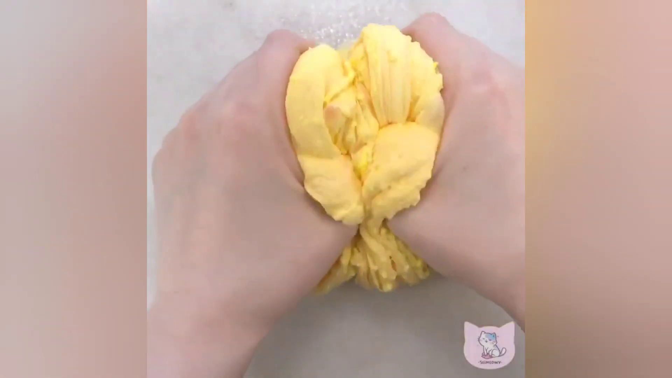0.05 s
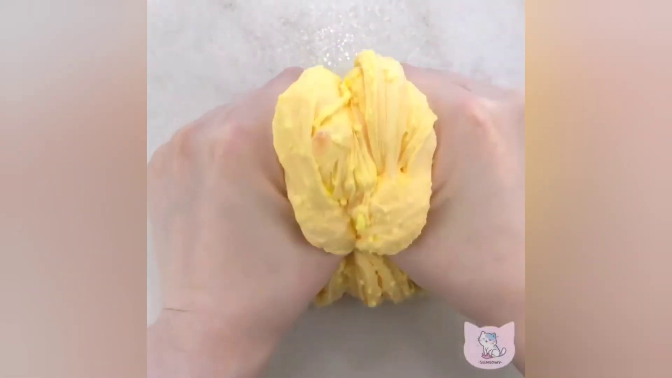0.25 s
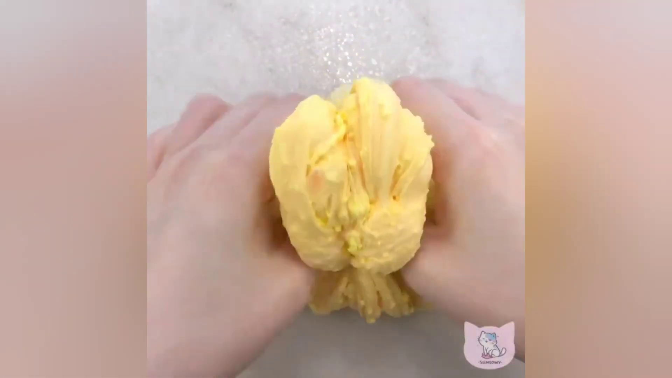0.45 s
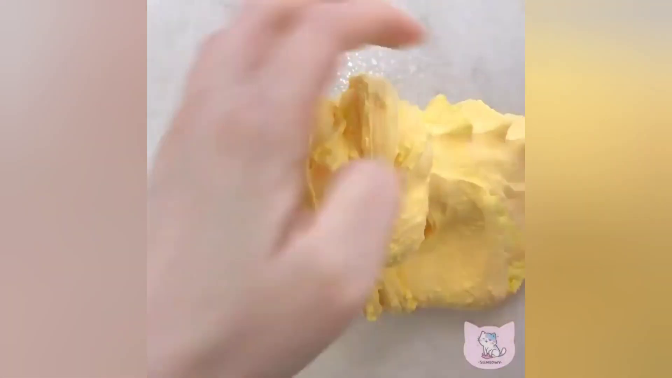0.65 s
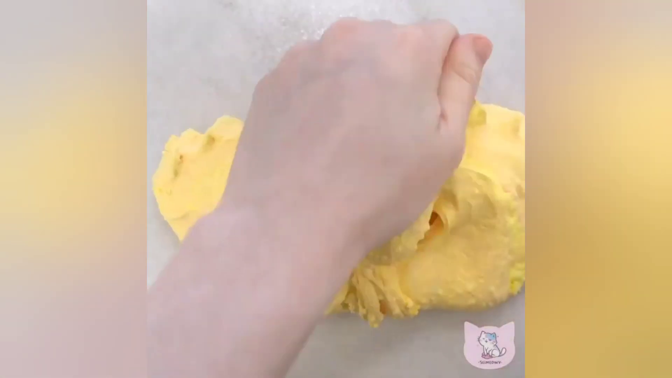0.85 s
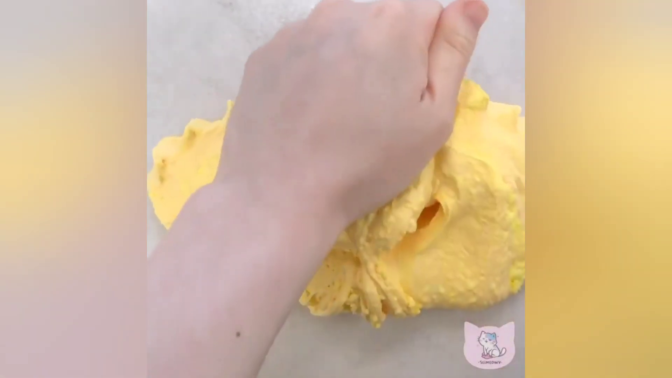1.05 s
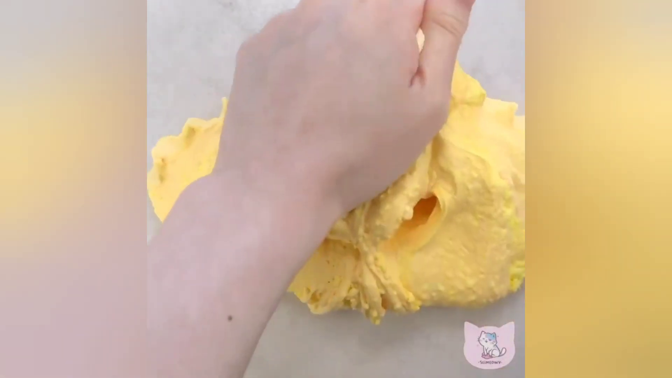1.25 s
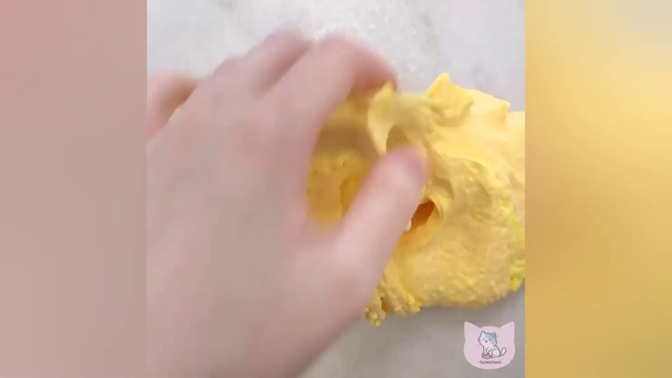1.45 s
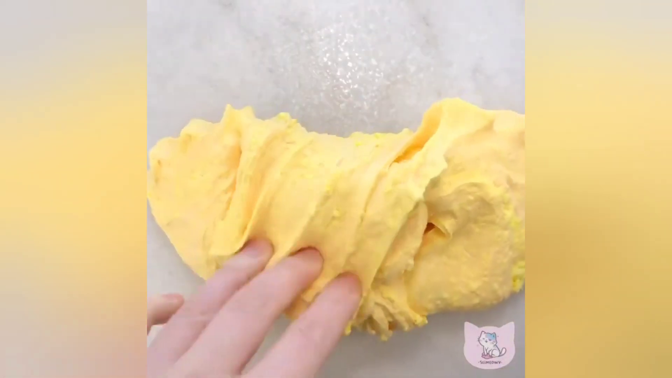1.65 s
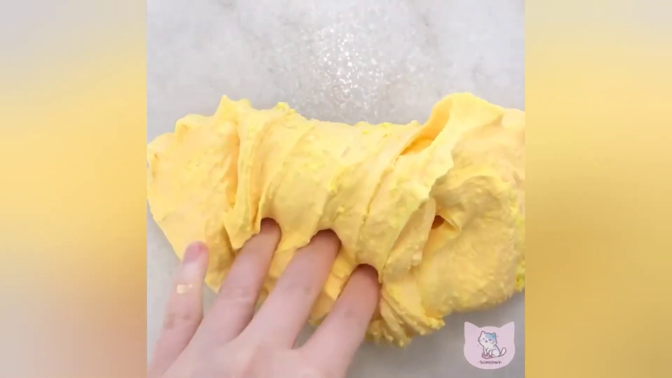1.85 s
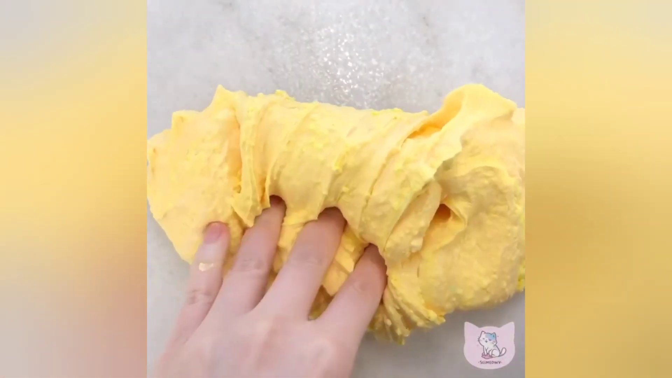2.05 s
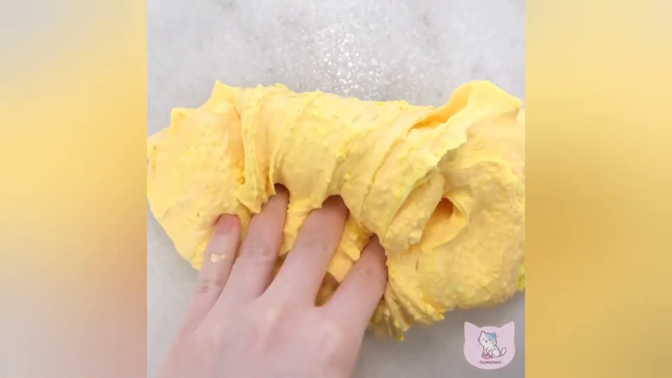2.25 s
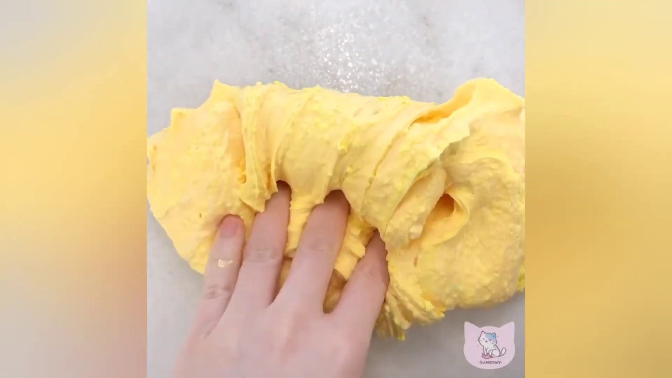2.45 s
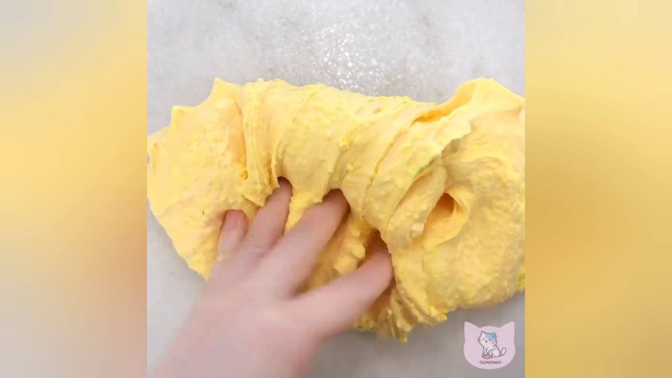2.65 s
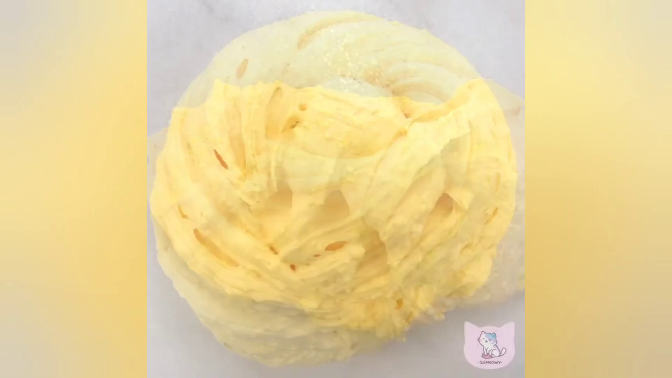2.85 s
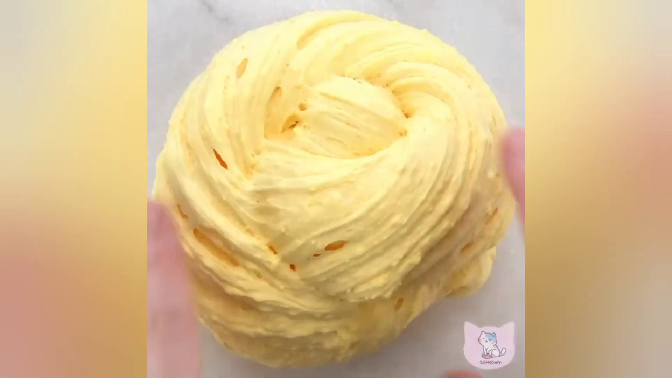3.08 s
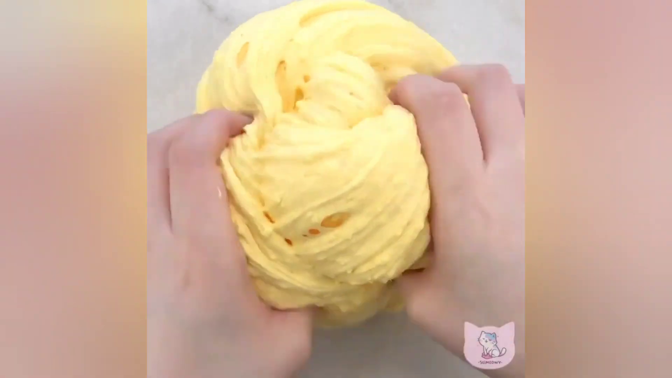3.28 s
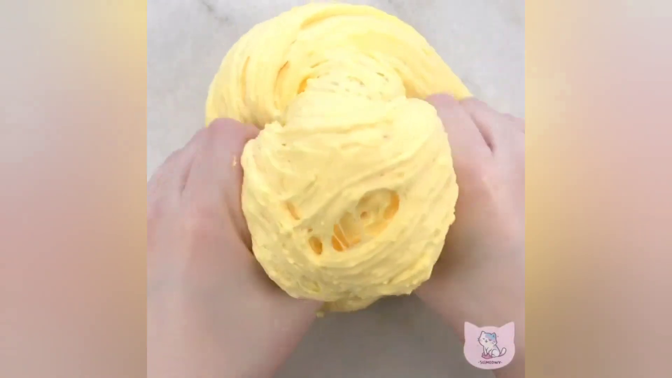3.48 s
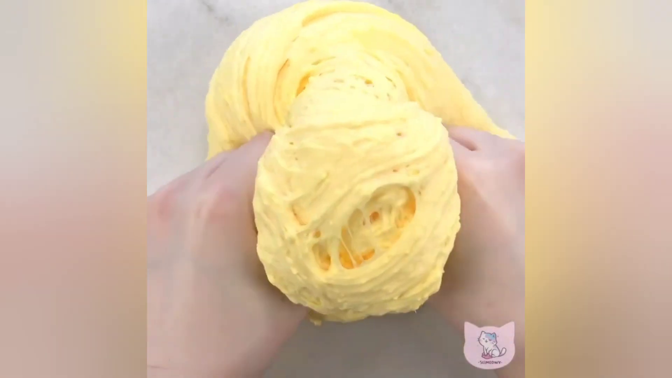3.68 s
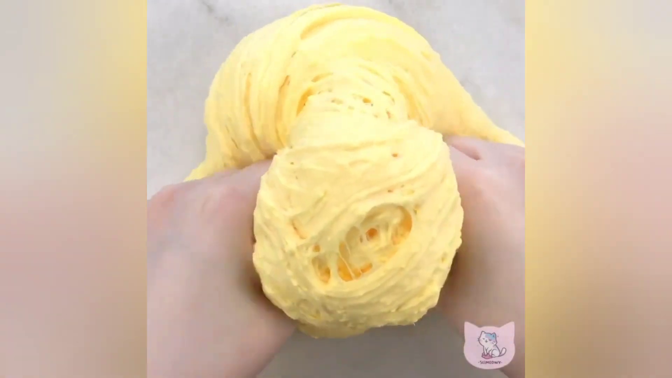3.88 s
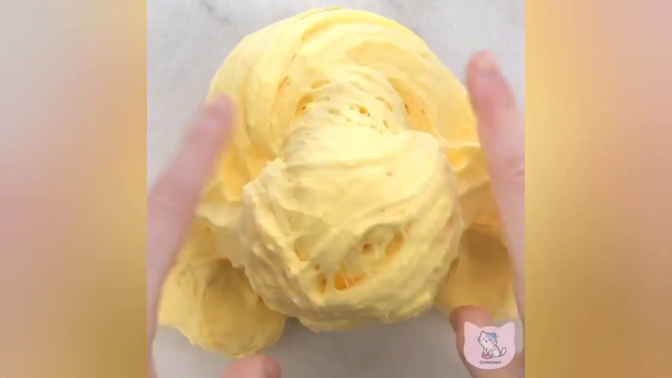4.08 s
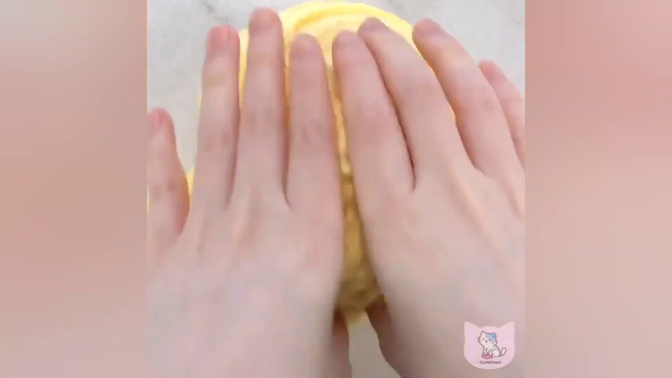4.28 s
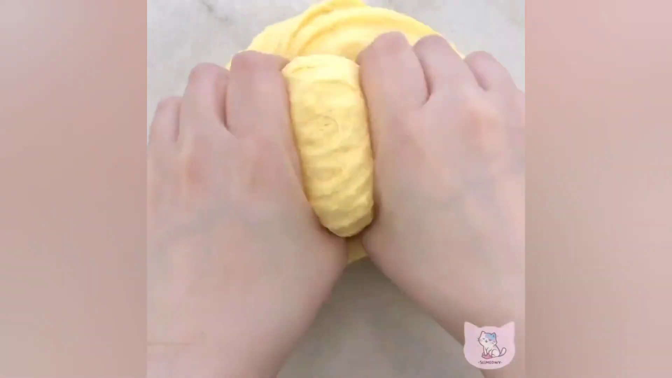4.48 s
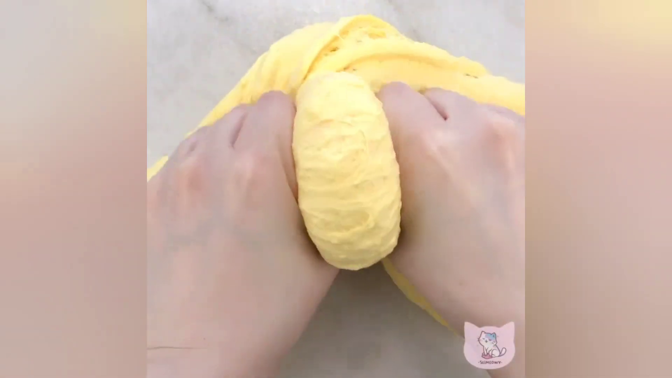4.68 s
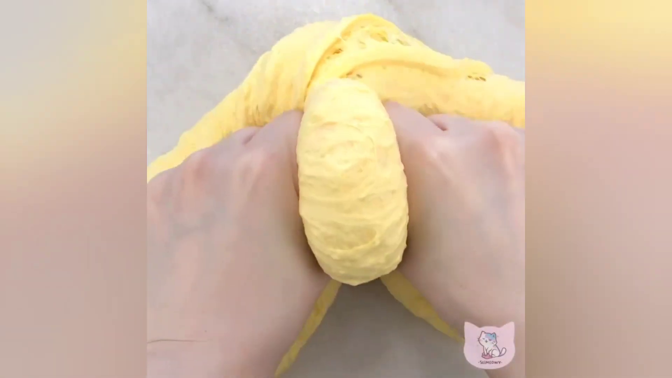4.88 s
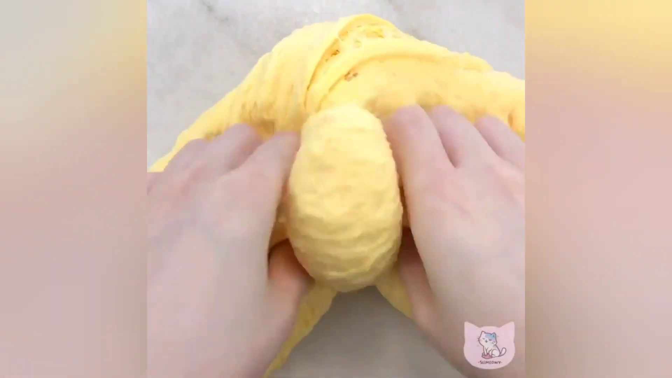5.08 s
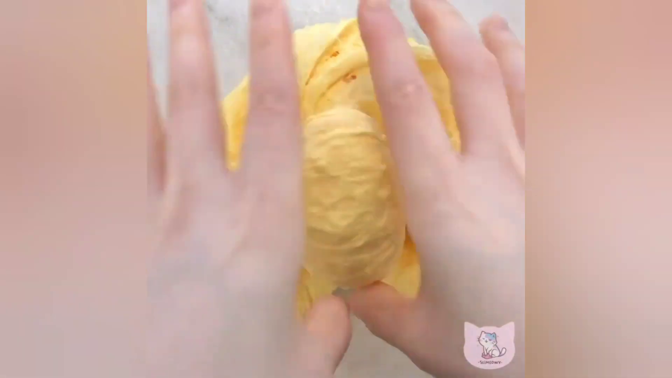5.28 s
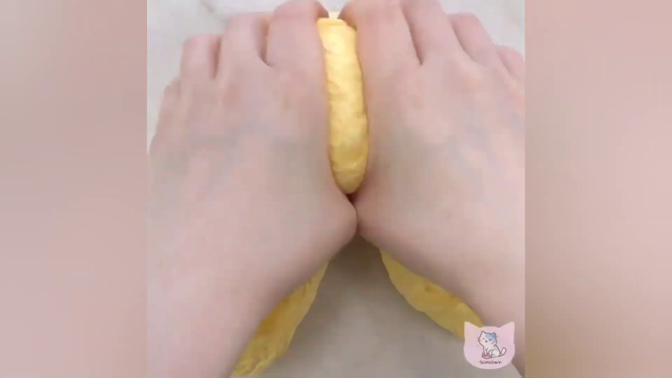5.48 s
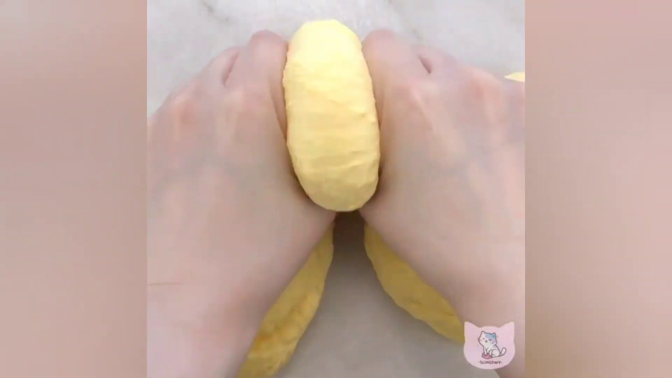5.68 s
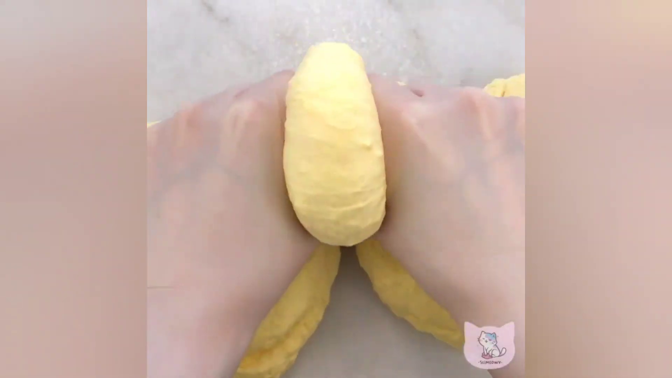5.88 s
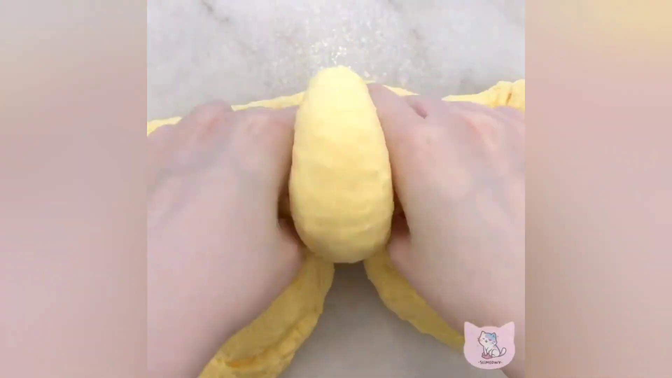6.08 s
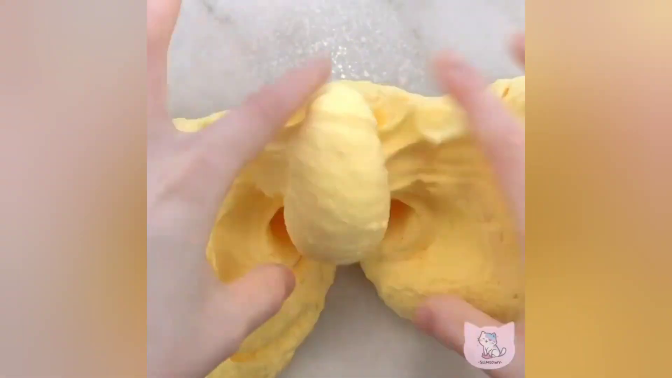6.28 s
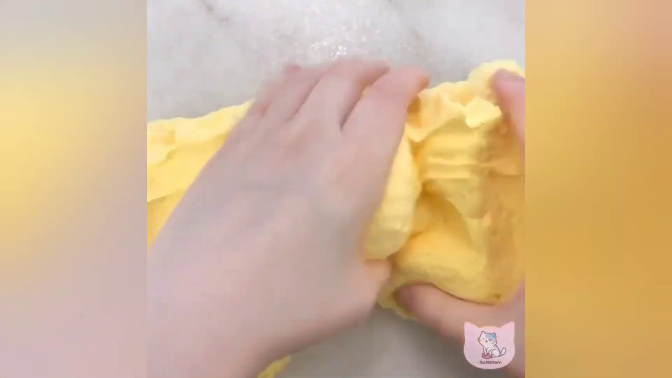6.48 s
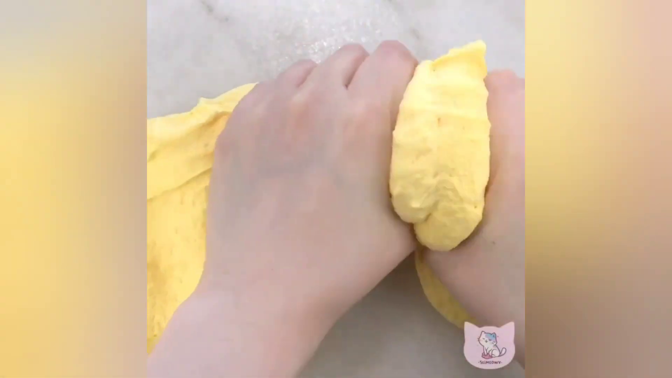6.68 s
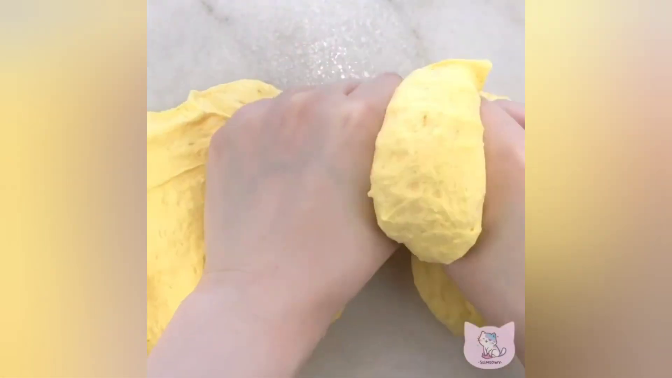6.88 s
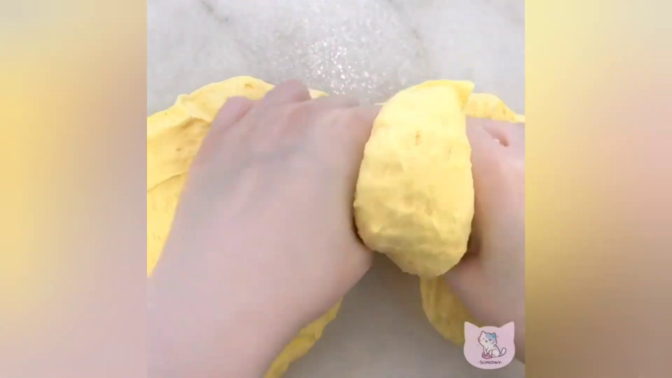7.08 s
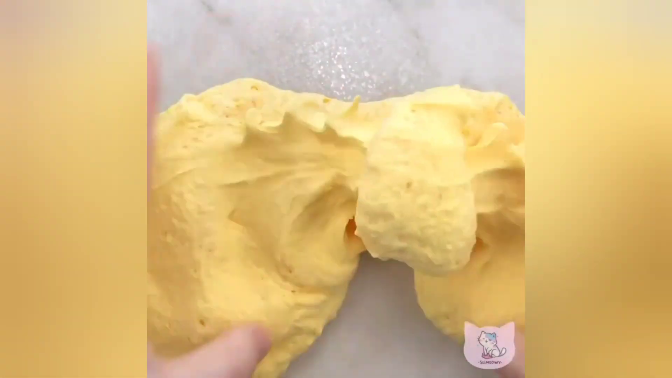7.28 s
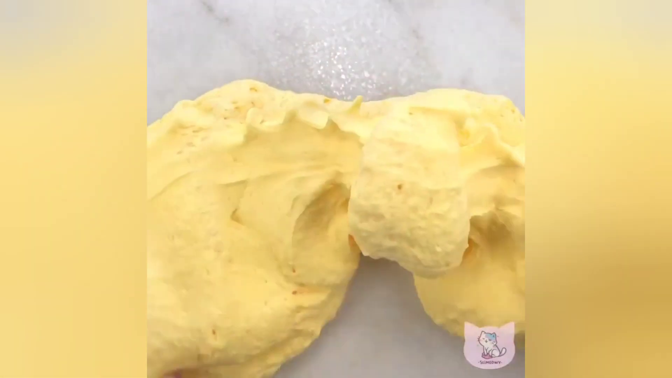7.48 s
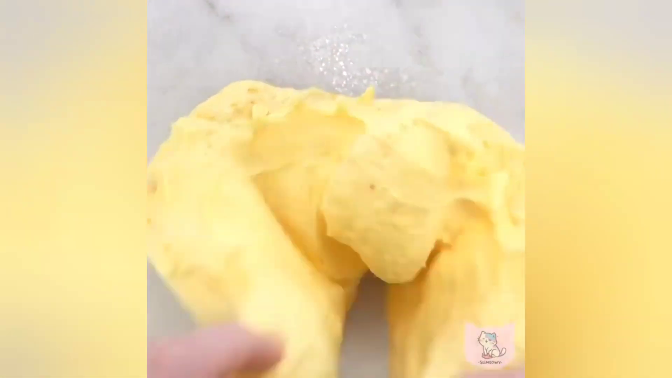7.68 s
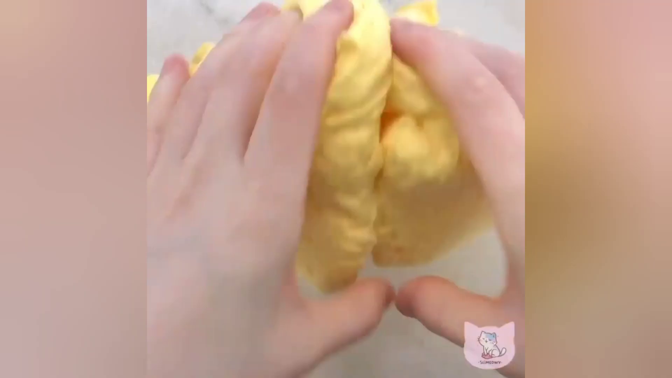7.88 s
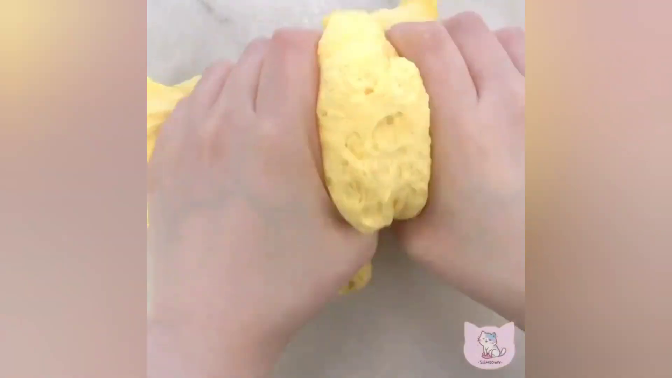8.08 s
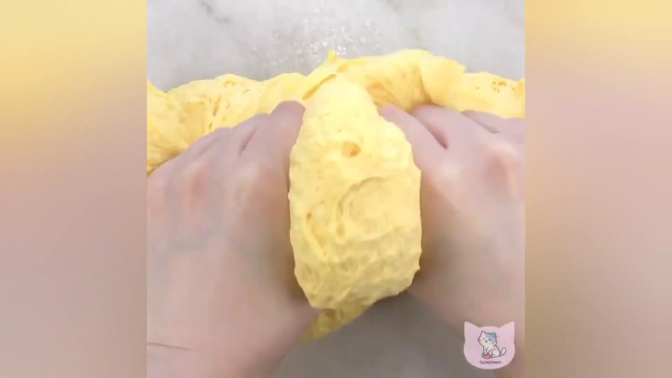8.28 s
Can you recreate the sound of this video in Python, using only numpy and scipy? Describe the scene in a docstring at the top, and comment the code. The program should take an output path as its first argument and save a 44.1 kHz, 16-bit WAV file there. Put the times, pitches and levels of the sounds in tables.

```python
"""Sharp pops and a rush of tearing come first: two hands squeeze, tear and fold a thick airy slime on a
stone worktop, close to one microphone. Bursting air pockets are chirps that fall in pitch, with thuds and
sprays of noise; tearing films are random crackle split into fizz, smack and squelch. Suction and bubbles
ring as hollow tones, slits hiss or squeak, and below lie a quiet room hum and a far engine changing speed."""
import sys
import numpy as np
from scipy import signal
from scipy.io import wavfile

SR = 44100
rng = np.random.default_rng(int(sys.argv[2]) if len(sys.argv) > 2 else 0)


def wrap_up_sound(samples):
    """Save the sound to the file named by the first command line argument, as 16-bit audio."""
    columns = np.atleast_2d(samples).T
    # keep every value between -1 and 1, then stretch to whole-number steps
    tamed = np.clip(columns, -1, 1)
    steps = np.round(tamed * 32767).astype(np.int16)
    wavfile.write(sys.argv[1], SR, steps)


N = 367794  # length in samples

# Bursting air pockets: start_s, chirp_level_db, pitch_hz (the chirp falls from 1.32 to 0.5 times this),
# thud_level_db, snap_level_db, fray_db (under the snap); chirp and snap levels are before trim
POCKETS = [(0.016, 4.5, 3340, -10, -24, -2), (0.047, -10.5, 990, -21, -28, -1),
           (0.069, -25, 5050, -15, -27, -20), (0.108, -9, 8500, -3.5, -18, -6),
           (0.127, 6, 8300, -40, -27.5, -6), (0.174, -22, 8000, -45, -41, -9),
           (0.199, -17, 7300, -13, -20, -8.5), (0.245, -11.5, 1870, -25, -23, -1.5),
           (0.253, -17, 3840, -45, -26.5, -13), (0.384, -12.5, 3670, -36, -53, -12),
           (0.736, -18.5, 2220, -32, -63, -12), (0.748, -26, 1500, -27, -57, -16),
           (0.780, -20, 1300, -40, -55, -14), (0.761, -14.5, 1070, -19.5, -63, -12),
           (0.804, -17.5, 990, -43, -46, -9), (0.815, -8, 5000, -41, -31, -8),
           (0.859, -4.5, 5860, -27, -37, -22), (0.877, -9, 1620, -12.5, -38, 4),
           (0.935, -0.5, 3180, -15, -35, 2), (0.953, -2.5, 1750, -14, -32.5, 3),
           (0.993, -30, 2500, -35, -34, 2), (1.013, -23, 1470, -20, -30, -16),
           (1.03, 5.5, 8700, -27, -22.5, -8), (1.043, -5, 8730, -40, -39, -27),
           (1.063, -5, 7020, -42, -19, -7.5), (1.078, -19, 1450, -18, -35, -19.5),
           (1.099, -1.5, 2540, -5.5, -22.5, -9), (1.156, -0.5, 1380, -6, -14, -4.5),
           (1.164, -14, 1080, -42, -32, -15), (1.244, -16.5, 3250, -45, -42.5, -4),
           (1.39, -22, 3230, -25, -48, 3), (1.614, -9.5, 3600, -28.5, -34, -0.5),
           (1.677, -24, 3380, -54, -48, 0), (1.702, -7, 8000, -53, -28.5, -14),
           (1.736, -13, 2730, -28, -43, -19), (1.805, -33, 5670, -56, -46, -24),
           (1.827, -11.5, 5600, -59, -32.5, -16), (1.973, -31.5, 1090, -38, -42, -13),
           (2.117, -30, 5960, -63, -45.5, -4), (2.158, -19, 9000, -46, -45, -9),
           (2.39, -20.5, 6700, -44, -54, -10), (2.586, -29, 2140, -48, -40, -26),
           (2.605, -19, 1730, -31, -57, -18), (2.65, -24, 1780, -11, -30, -7),
           (2.67, -10, 6500, -20, -31.5, -5), (2.717, -20.5, 2280, -21, -35.5, -16),
           (3.253, -16, 7800, -33, -32.5, -3), (3.406, -13.5, 1610, -54, -37, -12),
           (3.44, -38, 2700, -45, -35, -22), (3.704, -27, 8700, -25, -24.5, -16),
           (3.908, -6, 1710, -13, -37, -22), (3.92, -6.5, 1640, -14, -45, -17),
           (4.416, -18, 5830, -33, -42, -10), (4.548, -26, 8270, -39, -27.5, -13),
           (4.559, -33, 2020, -37, -35.5, -3), (4.593, -12, 6360, -43, -31, -2.5),
           (4.743, -13, 2370, -17.5, -35, -1), (4.806, -23, 3320, -52, -42, -5),
           (5.051, 6, 1830, -2, -26, -7), (5.467, -17, 1600, -42, -37, -14),
           (5.491, -10, 6200, -36, -51, -12), (5.632, -31, 4050, -38, -37, -3),
           (5.703, -32, 1420, -27, -34.5, -12), (5.75, -1.5, 2130, -12, -21.5, -32),
           (5.814, -18.5, 1080, -44, -52, -12), (5.849, -20, 7700, -44, -33.5, -6.5),
           (5.877, -16, 2030, -32, -31, -24), (6.1, 1, 2200, -5, -34, -5),
           (6.106, 2.5, 1104, -1.5, -27, -18), (6.438, -24, 1150, -39, -29.5, -9),
           (6.456, -10.5, 1670, -37, -25.5, -10), (6.502, -2.5, 2700, -17, -21.5, -15),
           (6.517, -9.5, 1390, -40, -35, -5), (6.548, -14, 2500, -31, -42, -14),
           (6.642, -24, 1430, -20.5, -32, -5), (6.714, -21, 8020, -51, -29.5, -12),
           (6.755, -28, 1300, -46, -28, -9), (6.816, -12.5, 3480, -33, -42, -2),
           (6.867, -20.5, 1110, -31, -37, -1), (7.072, -8, 1520, -30, -39, -9),
           (7.096, -0.5, 1880, -5, -38, -16), (7.100, -7, 6500, -40, -31, -5),
           (7.369, -13.5, 4450, -46, -37.5, -9), (7.823, -13, 6800, -39, -35, -9),
           (7.923, -22, 1960, -39, -43, -2), (8.025, -13, 3320, -45, -41, -12),
           (8.18, -27, 5400, -46, -35, -5), (8.217, -13, 5300, -32, -27.5, -12),
           (8.24, -10, 4400, -48, -23, -20), (8.27, -7, 7300, -33, -27.5, -4)]


def from_db(db):
    """Turn a level in dB into a gain."""
    return 10 ** (np.asarray(db) / 20)


def rms_one(x):
    """Scale a signal to an rms level of 1."""
    return x / np.sqrt(np.mean(x ** 2) + 1e-20)


def in_time(rows):
    """Draw straight lines between table rows, giving each column a value at every sample."""
    s, *columns = np.transpose(rows)
    return [np.interp(np.arange(N) / SR, s, column) for column in columns]


def drift(rate_hz):
    """Smooth random wandering of spread about 1: noise through a low-pass set by rate_hz."""
    step = 40  # samples between the slow values
    r = np.exp(-2 * np.pi * rate_hz * step / SR)
    noise = rng.standard_normal(N // step + 2002)
    slow = signal.lfilter([1], [1, -2 * r, r * r], noise)[2000:]  # drop the filter's start-up
    return np.interp(np.arange(N) / step, np.arange(len(slow)), rms_one(slow))


def band(x, low_hz, high_hz):
    """Keep mainly the sound between two frequencies."""
    sos = signal.butter(2, [low_hz, min(high_hz, .45 * SR)], "band", fs=SR, output="sos")
    return signal.sosfilt(sos, x)


def coloured(excite, spectrum, flicker_db, rate_hz):
    """Shape two noises, used in turn, in half-octave bands that each flicker separately; rms 1."""
    hz, db = np.transpose(spectrum)
    band_count = np.ceil(2 * np.log2(hz[-1] / hz[0]))
    edges = hz[0] * np.sqrt(2) ** np.arange(band_count + 1)
    out = 0
    for k, (low, high) in enumerate(zip(edges, edges[1:])):
        level_db = np.interp(np.log(low * high) / 2, np.log(hz), db)
        gain = from_db(level_db + flicker_db * drift(rate_hz))
        out = out + gain * band(excite[k % 2], low, high)
    return rms_one(out)


def crackle(per_s, spread_db, smooth, clump_db):
    """Tiny ruptures of very uneven size arrive in clumps, over a smooth rush of air (smooth: its power share)."""
    born = rng.random(N) < per_s * from_db(clump_db * drift(25)) / SR
    size_db = spread_db * np.minimum(rng.exponential(1, (2, N)), 5)
    ruptures = born * from_db(size_db) * rng.choice([-1, 1], (2, N))
    rush = rng.standard_normal((2, N))
    return np.sqrt(1 - smooth) * rms_one(ruptures) + np.sqrt(smooth) * rush


def kneading():
    """Films fizz on top, wet faces smack apart in the middle, finger hollows squelch below."""
    # Tone of each layer, all three: pitch_hz, relative_level_db (per Hz)
    fizz_tone = [(1470, -26), (2500, -12.5), (5440, -0.5), (8870, -5.5), (14900, -9), (16000, -9)]
    smack_tone = [(400, -32), (600, -1.5), (1000, 1.5), (2000, 2.5), (3500, -0.5), (5500, -15.5)]
    squelch_tone = [(59, -55), (100, -13), (242, 1.5), (393, -2), (473, -16), (900, -7.5), (1170, -16.5),
                    (1980, -120)]
    fizz_gain, smack_gain, squelch_gain = handling()
    throb_db = 1.5 * drift(30)  # tearing goes in jerks, heard in all layers at once
    tearing = crackle(500, 4.7, 0.65, 5.0)  # the same ruptures tick in the treble and the middle
    fizz = coloured(tearing, fizz_tone, 2.5, 20) * fizz_gain * from_db(throb_db)
    wet_faces = 0.84 * coloured(tearing, smack_tone, 2.5, 30) + 0.43 * blips(300, 16)
    smack = wet_faces * smack_gain * from_db(throb_db)
    low_crackle = crackle(200, 3.5, .7, 3.0)
    squelch = coloured(low_crackle, squelch_tone, 2.0, 12) * squelch_gain * from_db(throb_db / 2)
    return fizz + smack + squelch


def handling():
    """Gains of fizz, smack and squelch: each press or peel touches, swells, sags and is let go; bursts fizz on."""
    # Hands press in and the films tear: strongest_s, lead_s (from first touch), length_s,
    # swell_db_per_s, sag_db_per_s, fizz_db, smack_db, squelch_db (levels before mixing)
    presses = [(0.0, .01, 0.37, 94, 88, -27.5, -29, -33), (0.904, 0.15, 0.32, 66, 22, -43, -38.5, -50),
               (1.51, .1, 0.63, 52, 35, -56, -65, -64), (3.256, .12, 0.49, 53.5, 17, -40.5, -45, -51),
               (4.43, 0.17, 0.45, 40, 35.5, -38, -41.5, -49),
               (5.471, 0.091, 0.29, 90, 20.5, -38.5, -41, -45.5),
               (5.85, 0.045, 0.12, 150, 82, -44.5, -49.5, -53.5),
               (6.528, 0.16, 0.42, 104, 26.5, -37, -40, -46),
               (7.424, 0.064, 0.32, 203, 21.5, -41, -39.5, -39), (8.21, 0.42, .2, 21, 19, -39, -40, -49.5)]
    # Sticky hands peel off the slime: strongest_s, length_s, sag_db_per_s,
    # fizz_db, smack_db, squelch_db (levels before mixing)
    peels = [(0.432, 0.09, 21, -33.5, -33.5, -36), (1.311, 0.12, 35, -41, -38, -51),
             (2.674, 0.041, 147, -36.5, -39.5, -40.5), (3.915, 0.15, 63, -27, -25.5, -27),
             (5.063, 0.15, 80, -27, -26, -23), (6.104, .14, 110, -26, -24.5, -24.5),
             (7.1, .1, 87, -26.5, -24.5, -22.5)]
    # The slime creeping when left alone: fizz_db, smack_db, squelch_db, before the changes below
    rest_db = [-64, -64.5, -58.5]
    low_rise_s, low_rise_db = 3.0, 6  # from here on the low squelch layer is louder
    hush_start_s, hush_end_s, hush_db = 2.5, 3.11, -7.5  # no hand on it: creeping fizz and smack sink
    peel_lead_s, peel_swell_db_per_s = .1, 299
    touch_db_per_s, let_go_db_per_s = 498, 448  # how fast contact starts and ends
    after_fizz_db = [-9, -17.5, -15]  # a burst film fizzes on: fizz, smack, squelch, under its fraying
    after_fizz_t60_s, after_fizz_rise_s = 0.085, 0.001

    t = np.arange(N) / SR
    hush = np.outer([hush_db, hush_db, 0], (t > hush_start_s) & (t < hush_end_s))
    low_rise = np.outer([0, 0, low_rise_db], t > low_rise_s)
    gain = from_db(np.c_[rest_db] + hush + low_rise)

    full_peels = [(s, peel_lead_s, length, peel_swell_db_per_s, *rest) for s, length, *rest in peels]
    for s, lead, length, swell, sag, *level_db in presses + full_peels:
        before, after = np.maximum(s - t, 0), np.maximum(t - s, 0)
        rise_db = swell * before + touch_db_per_s * np.maximum(before - lead, 0)
        fall_db = sag * after + let_go_db_per_s * np.maximum(after - length, 0)
        gain += from_db(np.c_[level_db] - (rise_db + fall_db))

    bursts = np.zeros(N)
    for s, *_, snap_db, fray_db in POCKETS:
        bursts[round(s * SR)] += from_db(snap_db + fray_db)
    decay = from_db(-60 / (after_fizz_t60_s * SR))
    dying = signal.lfilter([1], [1, -decay], bursts + 1e-18)
    slow = np.exp(-1 / (after_fizz_rise_s * SR))
    after_fizz = signal.lfilter([1 - slow], [1, -slow], dying)
    return gain + from_db(np.c_[after_fizz_db]) * after_fizz


def blips(per_s, cycles):
    """Small wet bubbles close at random, each ringing a few cycles at one of 16 pitches; rms 1."""
    size_db = 5 * np.minimum(rng.exponential(1, N), 3.5)
    born = (rng.random(N) < per_s / SR) * from_db(size_db)
    pitch_number = rng.integers(0, 16, N)
    out = 0
    for k, hz in enumerate(np.geomspace(600, 3200, 16)):
        r = from_db(-60 * hz / (cycles * SR))  # 60 dB down after this many cycles
        w = 2 * np.pi * hz / SR
        strikes = (-1) ** k * born * (pitch_number == k) + 1e-18
        out = out + signal.lfilter([0, np.sin(w)], [1, -2 * r * np.cos(w), r * r], strikes)
    return rms_one(signal.lfilter([.3], [1, -.7], out))  # soften the treble


def pops():
    """Each burst: a falling chirp as the hole widens, a low thud, a snap, a spray of torn film, a worktop echo."""
    size = 4096  # samples per burst
    t = np.arange(size) / SR
    body, spray, click = np.zeros((3, N + size))
    thud_cycles = 420 * t + 1500 * 0.00163 * (1 - np.exp(-t / 0.0013))  # falls towards 420 Hz
    thud = np.sin(2 * np.pi * thud_cycles) * from_db(-60 * t / 0.016) * (1 - np.exp(-t / 0.0024))
    snap = (t / .0005) ** 2 * np.exp(2 - 2 * t / .0005)  # the film gives way within a millisecond
    fray = from_db(-60 * t / 0.049) * (1 - np.exp(-t / 0.0011))  # then its edges fray
    for s, chirp_db, hz, thud_db, snap_db, fray_db in POCKETS:
        at = round(s * SR)
        # pitch drops as the cavity opens
        cycles = hz * (.5 * t + 1.008 * 0.0013 * (1 - np.exp(-t / 0.0016)))
        chirp_fade = from_db(-60 * t * hz / 14.0)  # higher pitches die sooner
        chirp = np.sin(2 * np.pi * cycles) * chirp_fade * (1 - np.exp(-t / 0.000062))
        body[at:at + size] += from_db(chirp_db - 6.5) * chirp + from_db(thud_db) * thud
        spray[at:at + size] += from_db(snap_db + 7.0) * (snap + from_db(fray_db) * fray)
        click[at:at + 2] += from_db(snap_db + 6.5) * np.array([1, -1])  # the rupture itself
    torn_film = spray[:N] * rng.standard_normal(N) + click[:N]
    direct = body[:N] + band(torn_film, 1600, 19000)
    lag = round(.0016 * SR)
    direct[lag:] += from_db(-9) * direct[:N - lag]  # echo off the worktop
    return direct


def suction():
    """Hollow tones: finger suction letting go, and a few bubbles, ring for a few soft cycles."""
    # Hollow tones: start_s, level_db (before the soft onset), pitch_hz, t60_s (time to fade by 60 dB)
    hollow_tones = [(0.443, -22, 353, 0.05), (.478, -18, 1060, 0.043), (.521, -24, 780, 0.055),
                    (1.299, -25.5, 298, 0.052), (2.7, -24, 597, .04), (2.664, -19.5, 383, 0.044),
                    (3.912, -11.5, 232, 0.059), (5.087, -18.5, 246, 0.11), (6.102, -15, 212, 0.12),
                    (7.103, -4.5, 247, 0.09)]
    out = np.zeros(N)
    for s, level_db, hz, t60 in hollow_tones:
        t = np.maximum(np.arange(N) / SR - s, 0)
        envelope = from_db(level_db - 60 * t / t60) * (1 - np.exp(-t / 0.0028))
        out += envelope * np.sin(2 * np.pi * hz * t)
    return out


def jets():
    """Air hisses out of a pinhole: short bright bands of noise, held and then cut off."""
    # Hisses: start_s, length_s, lowest_hz, highest_hz, level_db
    pinholes = [(.129, .02, 9200, 10900, -30), (0.284, .045, 9500, 12100, -41.5),
                (1.031, 0.022, 8500, 16500, -20.5)]
    edge_s = 0.0023  # fade at either end
    t, air = np.arange(N) / SR, rng.standard_normal(N)
    out = np.zeros(N)
    for s, length, low_hz, high_hz, level_db in pinholes:
        held = np.clip(np.minimum(t - s, s + length - t) / edge_s, 0, 1)
        out += from_db(level_db) * held * rms_one(band(air, low_hz, high_hz))
    return out


def squeaks():
    """Air squeaks out of a narrow slit: a short whistle sliding down as the slit opens."""
    # Whistles: start_s, peak_db, start_hz, end_hz, length_s
    slits = [(3.383, -28.5, 2420, 1630, 0.014)]
    out, t = np.zeros(N), np.arange(N) / SR
    for s, peak_db, start_hz, end_hz, length in slits:
        u = np.clip((t - s) / length, 0, 1)  # progress from 0 to 1
        cycles = length * (start_hz * u + (end_hz - start_hz) * u ** 2 / 2)
        out += from_db(peak_db) * np.sin(np.pi * u) * np.sin(2 * np.pi * cycles)
    return out


def tail(x, t60, low_hz, high_hz):
    """Near walls and worktop answer with a short diffuse decay, made of fading noise."""
    t = np.arange(SR // 4) / SR
    noise = band(rng.standard_normal(len(t)), low_hz, high_hz)
    echo = noise * from_db(-60 * t / t60) * (t > .002)
    return signal.fftconvolve(x, echo / np.sqrt(np.sum(echo ** 2)))[:N]


def room():
    """Steady shaped room noise, and a narrow band of noise as a low rumble that swells and fades."""
    # Tone of the room: pitch_hz, relative_level_db (per Hz)
    room_tone = [(12, -35), (20, -29), (55, -2), (146, 7.5), (210, -6.5), (255, 3.5), (873, -37),
                 (8890, -36), (14700, -43), (16000, -37)]
    # Level of the rumble: time_s, level_db
    rumble_level = [(0.0, -57), (0.14, -77), (0.44, -62), (1.88, -73), (2.55, -56), (3.2, -67), (4.5, -55),
                    (5.82, -64), (5.89, -51), (6.26, -46), (6.45, -53.5), (8.33, -64)]
    floor = from_db(-55) * coloured(rng.standard_normal((2, N)), room_tone, 0.54, 11)
    rumble = rms_one(band(rng.standard_normal(N), 53.6, 58.0))
    return floor + from_db(in_time(rumble_level)[0]) * rumble


def engine():
    """Only one low order of the far engine gets through the walls: a gliding tone wavering in level."""
    # One table for each time it is heard: time_s, pitch_hz, level_db (before the wavering)
    engine_runs = [
        [(4.0, 94.4, -53), (4.6, 99.6, -52), (4.85, 112.3, -48.5), (5.3, 137, -50), (5.6, 168, -41.5),
         (5.8, 184, -50)],
        [(6.2, 184, -45), (6.35, 161.8, -55), (6.7, 168.3, -47), (6.95, 140, -52), (7.05, 140, -77)],
        [(7.3, 160, -47.5), (7.55, 162.2, -49), (7.85, 143.6, -45.5), (8.05, 120, -56), (8.2, 114, -68)],
    ]
    out, t = np.zeros(N), np.arange(N) / SR
    for rows in engine_runs:
        hz, level_db = in_time(rows)
        heard = (t > rows[0][0]) & (t < rows[-1][0])
        gain = heard * from_db(level_db + 3.6 * drift(2.5))
        out += gain * np.sin(2 * np.pi * np.cumsum(hz) / SR)
    return out


def scene():
    """Mix all sources for one microphone: both channels hear the same."""
    burst = pops() + squeaks() + jets()
    walls = from_db(-15) * tail(burst, .12, 250, 15000)
    centre = burst + walls + kneading() + suction() + room() + engine()
    return np.array([centre, centre])


def record(dry):
    """Round the peaks, then cut the top steeply: 75 dB down from 16480 Hz upward."""
    steep_cut = signal.cheby2(18, 75, 16000 * 1.03, fs=SR, output="sos")
    return signal.sosfilt(steep_cut, np.tanh(dry))


dry = scene()
out = record(dry)
wrap_up_sound(out)
```